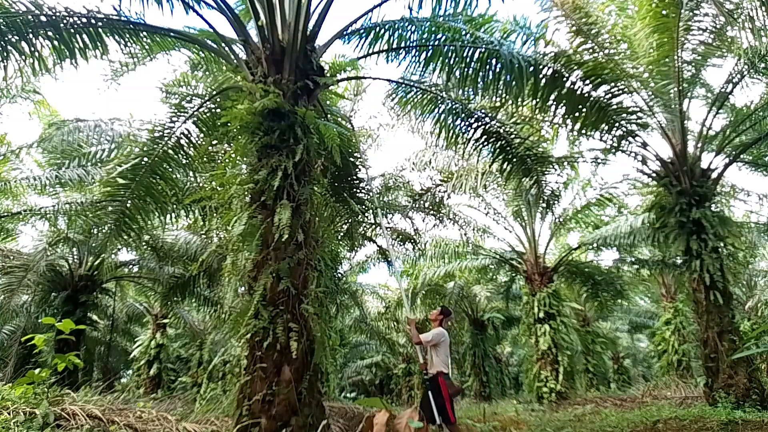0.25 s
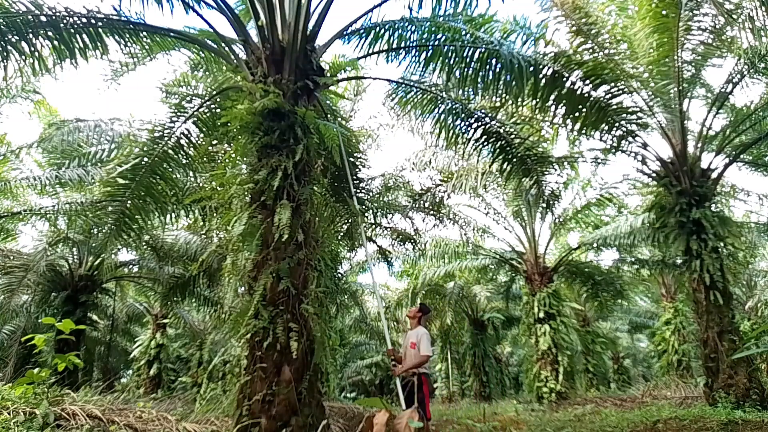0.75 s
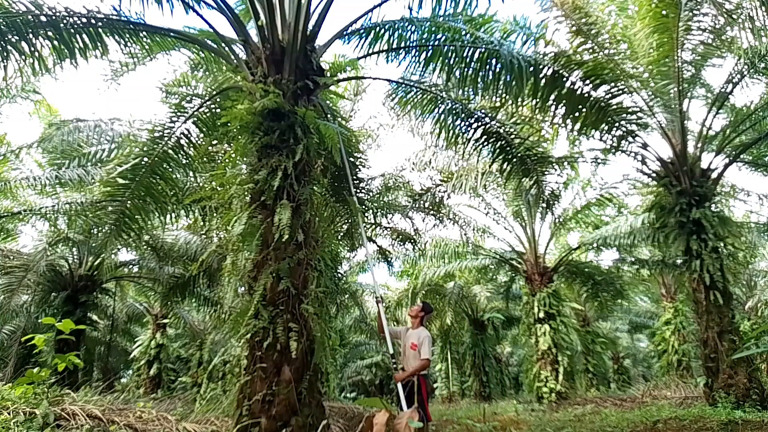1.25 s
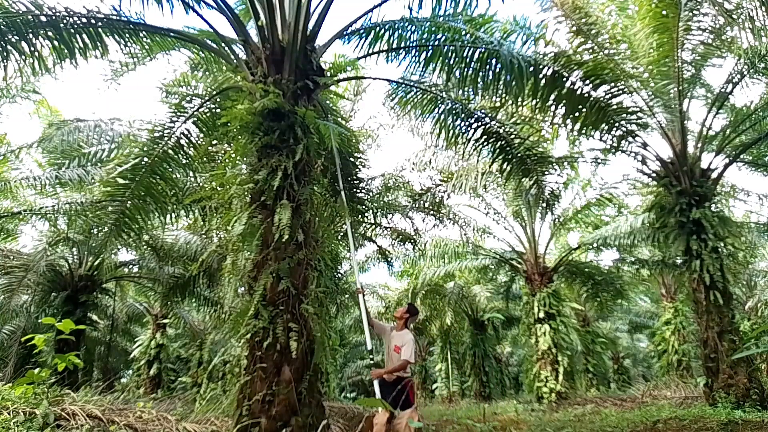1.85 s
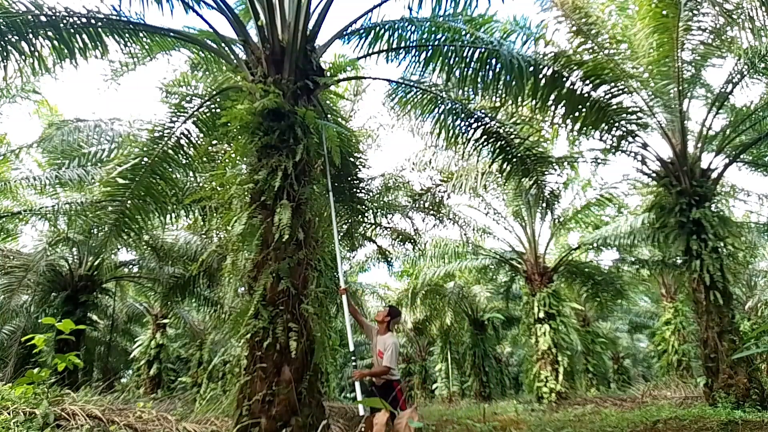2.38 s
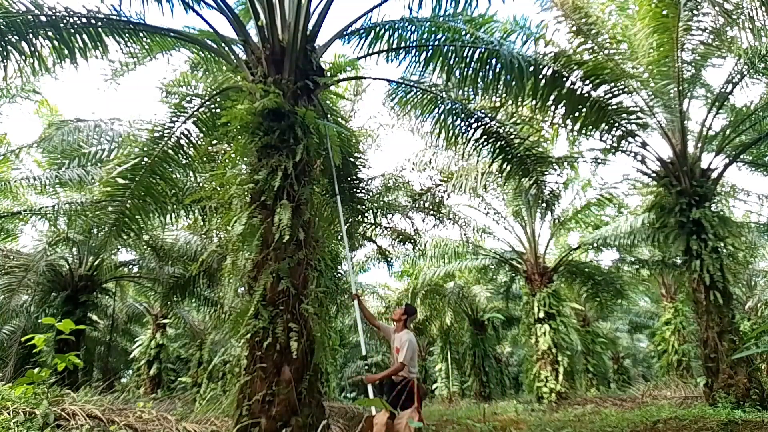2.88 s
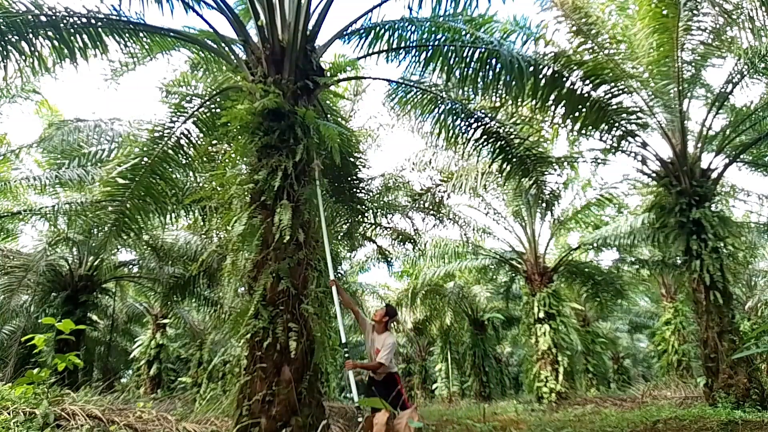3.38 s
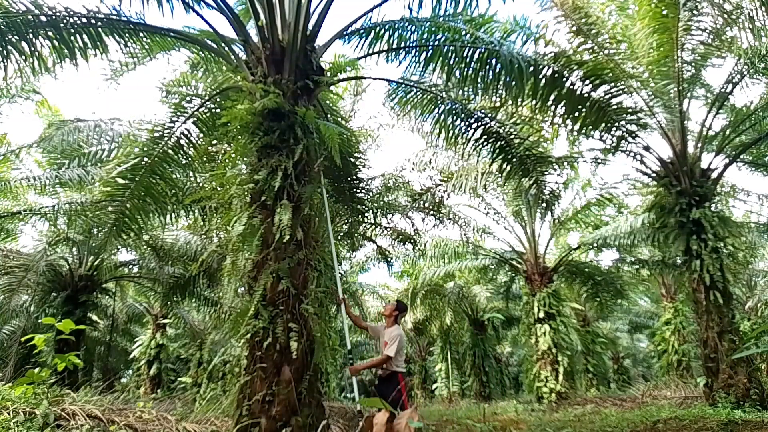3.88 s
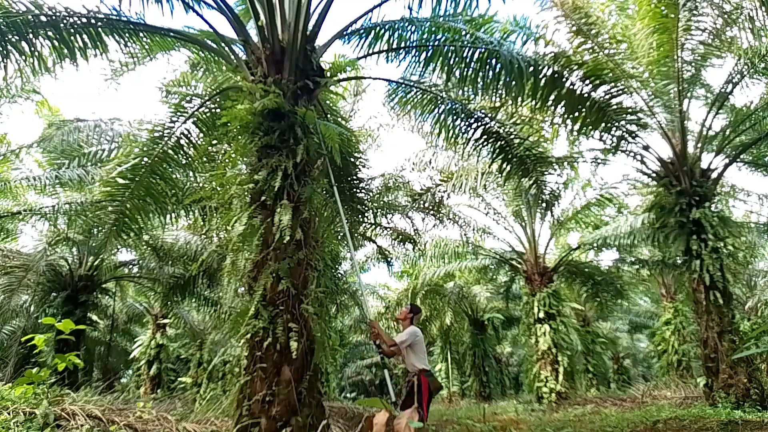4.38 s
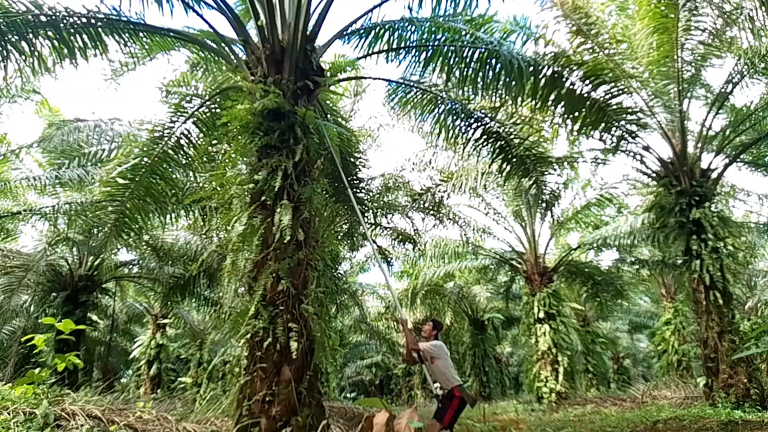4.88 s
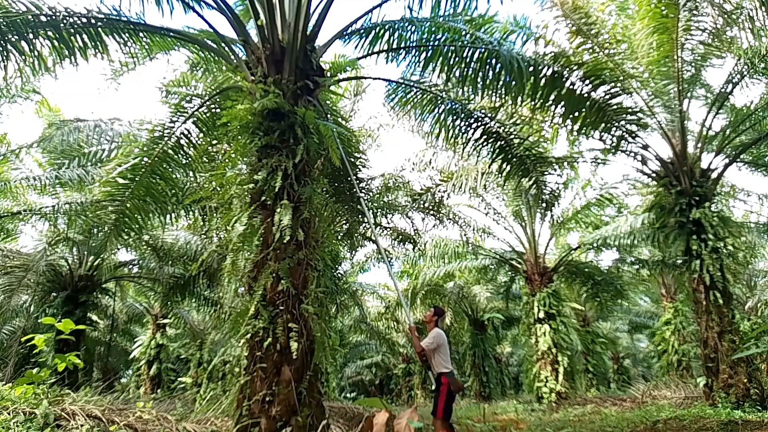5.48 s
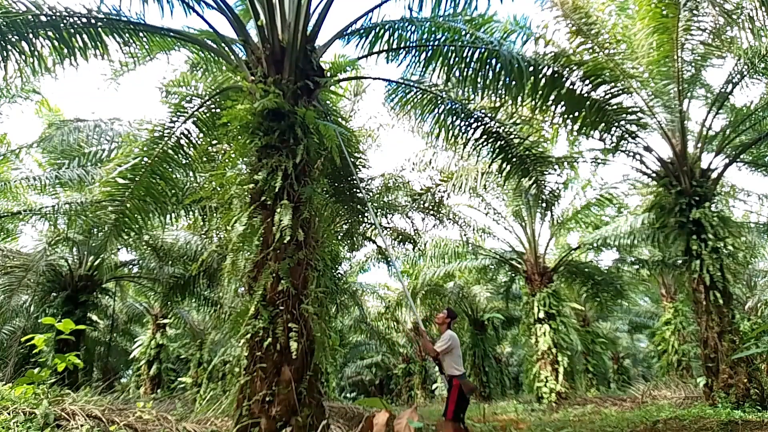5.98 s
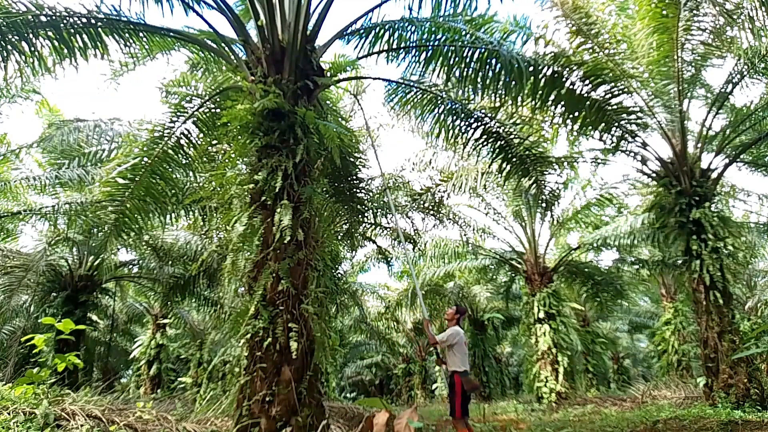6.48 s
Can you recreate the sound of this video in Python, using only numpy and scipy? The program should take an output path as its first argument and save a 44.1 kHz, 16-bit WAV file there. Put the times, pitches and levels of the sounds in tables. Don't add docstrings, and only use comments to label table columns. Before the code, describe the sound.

In an open palm grove, a small microphone some metres away hears a long-poled blade working overhead. Soft cicada buzz and leaf hush run throughout, with light stirring of dry fronds. At 0.65 s a short crack and fibre rip lands, with small ticks to 0.9. Around 1.45 s comes a sharp cut with a bright wooden knock. Softer crunches and squeaks follow at 2.3 and 2.55 s, as a very faint far engine rises in pitch. At 3.4-3.5 s a double tearing stroke ends in low stalk thumps and rustle. A knock sounds at 4.5 s, a crack at 4.8, then a long, loud ripping burst at 4.95-5.1 with snaps, squeaks and thumps. Rapid hard cracks and knocks hit at 5.65-5.8, and a final fierce crunch at 6.0-6.1 fades into leaf rustle, with a small snap at 6.65. A short tree-scattered wash trails each cut.

```python
import sys
import numpy as np
from scipy import signal
from scipy.fft import rfft, irfft
from scipy.io import wavfile
from scipy.ndimage import uniform_filter1d

SR = 44100
rng = np.random.default_rng(int(sys.argv[2]) if len(sys.argv) > 2 else 0)


def gain_from_db(level_db):
    decades = np.asarray(level_db, float) / 20
    return 10 ** decades


def output_pcm(signal):
    pcm = np.clip(np.atleast_2d(signal).T, -1, 1) * 32767
    wavfile.write(sys.argv[1], SR, np.round(pcm).astype(np.int16))


N = 297234


def unit(x):
    return x / np.sqrt(np.mean(x ** 2))


def track(table, column=1):
    rows = np.array(table, float)
    return np.interp(np.arange(N) / SR, rows[:, 0], rows[:, column])


def colour(x, points):
    hz, db = np.transpose(points)
    bin_hz = (np.arange(1025) + 0.1) * SR / 2048
    log_gain = np.interp(np.log(bin_hz), np.log(hz), db) * np.log(10) / 20
    cepstrum = irfft(log_gain)
    cepstrum[1:1024] *= 2
    cepstrum[1025:] = 0
    response = irfft(np.exp(rfft(cepstrum)))
    return signal.fftconvolve(x, response)[:len(x)]


def ring(x, hz, width_hz):
    return signal.lfilter(*signal.iirpeak(hz, hz / width_hz, fs=SR), x)


def walk(rate):
    hold = int(SR / rate)
    steps = np.repeat(rng.standard_normal(N // hold + 1), hold)
    smooth = uniform_filter1d(uniform_filter1d(steps, hold), hold)
    return 1.3 * smooth[:N]


def crackle(rate, spread_db):
    chance, sign, size = rng.random((3, N))
    clicks = (chance < rate / SR) * np.sign(sign - 0.5)
    return unit(clicks * gain_from_db(-spread_db * np.log(size + 0.04)))


def decay(t, t60):
    return np.exp(-np.log(1000) * t / t60)


def add(out, s, sound):
    i = int(s * SR)
    out[i:i + len(sound)] += sound[:N - i]


# pitch_hz, level_db (per Hz)
FIBRE_OUTLINE = [(290, -20), (500, -12), (833, -7.5), (925, -10), (1710, -5.5), (1880, -6), (2230, -8.5),
                 (2880, -8), (3470, -10), (8000, -30.5), (10400, -7), (17600, -120)]
# pitch_hz, level_db (per Hz)
LEAFLET_OUTLINE = [(3820, -25), (6500, -71), (7790, 3), (9510, 8.5), (12800, -13), (15100, -1.5),
                   (16000, -23)]


def tearing():
    fibre_db, stalk_db, leaflet_db, brightness_db = effort()
    slip = gain_from_db(2 * walk(110))
    outline_hz, outline_db = np.transpose(FIBRE_OUTLINE)
    fibres = power = 0
    bundles = crackle(220, spread_db=0.5)
    for hz in 600 * 2 ** np.arange(0, 3.8, 1 / 3):
        size_db = np.interp(np.log(hz), np.log(outline_hz), outline_db) + 10 * np.log10(hz)
        size = gain_from_db(size_db + brightness_db * np.log2(hz / 2200))
        grains = crackle(1200, spread_db=1.0) * gain_from_db(2.6 * walk(45)) + 0.6 * bundles
        fibres = fibres + size * unit(ring(ring(grains, hz, 0.53 * hz), hz, 0.51 * hz))
        power = power + size ** 2
    fibres = unit(fibres * slip / np.sqrt(power))
    creak = crackle(300, spread_db=2.0) * gain_from_db(2 * walk(50))
    stalk = unit(ring(ring(creak, 286, 101), 394, 170))
    leaflets = unit(colour(crackle(7200, spread_db=2.5) * slip, LEAFLET_OUTLINE))
    return gain_from_db(fibre_db) * fibres + gain_from_db(stalk_db) * stalk + gain_from_db(leaflet_db) * leaflets


# start_s, rise_s, hold_s, level_db, fade_s (by 60 dB)
BLADE_STROKES = [(.635, 0.018, 0.0042, -39.5, 0.049), (1.427, 0.017, 0.0035, -42.5, 0.074),
                 (1.45, 0.015, 0.027, -54, 0.17), (2.288, 0.013, 0.035, -45.5, 0.13),
                 (3.364, 0.02, 0.027, -44.5, 0.48), (3.45, 0.027, 0.01, -39.5, 0.14),
                 (4.33, 0.022, 0.022, -68, 1), (4.955, 0.033, 0.09, -33.5, 0.2),
                 (5.045, 0.015, 0.034, -35, 0.15), (5.63, 0.0028, 0.01, -45, 0.25),
                 (5.652, 0.005, 0.0084, -38.5, 0.05), (5.672, 0.0061, 0.026, -38, 0.29),
                 (5.757, 0.0014, 0.0038, -39, 0.03), (5.772, 0.0046, .005, -44, 0.21),
                 (5.989, 0.0057, .012, -64, .1), (6.012, 0.031, 0.018, -42, .2),
                 (6.058, 0.0068, 0.013, -39, 0.1), (6.081, 0.0035, 0.0079, -31, 0.13)]
# start_s, rise_s, hold_s, level_db, fade_s (by 60 dB)
FROND_SHAKES = [(.2, 0.034, 0.02, -57.5, 0.42), (.66, 0.016, .005, -52, 0.49),
                (.78, 0.058, 0.034, -62, 0.33), (1.483, .004, .01, -66, 0.36),
                (1.8, 0.043, 0.034, -61, 0.61), (2.34, 0.0069, 0.0088, -51.5, 0.33),
                (2.535, 0.0043, 0.011, -51.5, 0.5), (2.64, 0.031, 0.12, -59.5, 0.58),
                (3.51, 0.0067, 0.016, -54.5, 1.2), (3.71, 0.0052, 0.0098, -57, 1.33),
                (4.8, 0.011, 0.031, -59.5, 0.42), (5.1, 0.02, 0.005, -44.5, 0.51),
                (5.22, 0.013, 0.015, -62.5, 0.95), (5.8, 0.016, 0.024, -55, 0.53),
                (6.104, 0.0087, 0.017, -41, 0.4), (6.2, 0.021, 0.021, -57.5, 1.94),
                (6.65, 0.017, 0.031, -60.5, 0.6)]
# time_s, level_db
POLE_STIR = [(0.0, -73.5), (.13, -65.5), (.6, -69.5), (1.0, -66), (1.4, -64), (1.7, -65.5), (2.2, -68.5),
             (3.0, -68), (3.3, -68), (3.9, -71.5), (4.25, -64.5), (4.5, -62.5), (4.9, -63.5), (5.6, -64.5),
             (5.95, -65.5), (6.45, -71.5), (6.74, -72)]
# stalk_db, leaflets_db, brightness_db (per octave)
MOTION_EXCITES = [
    (-7, -15.5, -1.5),
    (-14.5, -9.5, 2),
    (-8.5, -15, -0.9),
]


def effort():
    power = np.array([swell(BLADE_STROKES), swell(FROND_SHAKES), gain_from_db(2 * track(POLE_STIR))])
    stalk_share, leaflet_share, brightness = np.array(MOTION_EXCITES).T
    total = power.sum(axis=0)
    fibre_db = 10 * np.log10(total)
    stalk_db = 10 * np.log10(gain_from_db(2 * stalk_share) @ power)
    leaflet_db = 10 * np.log10(gain_from_db(2 * leaflet_share) @ power)
    return fibre_db, stalk_db, leaflet_db, brightness @ power / total


def swell(motions):
    rise_db = 16.5
    t, power = np.arange(0, N / SR, 0.001), 1e-12
    for s, rise, hold, db, t60 in motions:
        rising = rise_db * np.clip((t - s) / max(rise, 0.001) - 1, -1, 0)
        fading = 60 * np.clip(t - s - rise - hold, 0, None) / max(t60, 0.02)
        power = power + (t >= s) * gain_from_db(2 * (db + rising - fading))
    return np.interp(np.arange(N) / SR, t, power)


# start_s, peak_db, pitch_hz, treble_db, length_s
SNAPS = [(0.6522, -26.5, 2000, -11, 0.004), (0.7645, -39.5, 1690, -18, 0.01),
         (1.4403, -31, 2000, -4, 0.006), (1.4832, -33, 3520, -10, 0.0018),
         (2.534, -29, 2000, -1, 0.0031), (2.535, -36.5, 5600, -3, 0.0089),
         (3.378, -37.5, 2430, -18, .008), (3.4635, -41, 4000, 9, .0051),
         (3.473, -47, 1450, -21, 0.0087), (4.811, -28.5, 2430, -20, 0.0037),
         (4.854, -38, 1550, -29, 0.02), (4.9615, -31, 2400, -20, 0.003),
         (4.974, -25, 2500, -31, 0.04), (5.633, -33.5, 1950, -4, 0.0091),
         (5.656, -28.5, 2300, -12, 0.018), (5.664, -20, 1800, 2, 0.0027),
         (5.7587, -21, 1900, -4, 0.0043), (5.778, -31, 1470, -22, 0.0073),
         (6.0445, -33, 1900, -20, .004), (6.086, -35, 2900, -18, 0.0021),
         (6.095, -42, 2670, -12, 0.0027), (5.677, -28, 1500, -20, .006),
         (5.7065, -28, 1500, -18, .007), (5.808, -37, 1300, -20, .006), (5.689, -33, 3500, -2, .003),
         (3.395, -35, 2600, -12, .004), (3.419, -36, 2300, -20, .004), (3.443, -38, 2000, -20, .004),
         (5.032, -26, 2300, -20, .003), (1.483, -26, 2000, -7, .001), (1.4405, -38, 4500, -6, .002),
         (6.0848, -19.5, 2600, -18, .004), (.868, -49, 4000, -20, .004)]
# start_s, peak_db, pitch_hz, length_s
MORE_SNAPS = [(0.224, -46, 1560, 0.044), (0.807, -44, 1700, 0.016), (0.868, -44, 1290, 0.018),
              (1.201, -46, 2100, 0.0079), (1.337, -47, 2500, 0.0055), (1.347, -42.5, 1900, .004),
              (1.969, -42.5, 1350, .004), (2.025, -47, 2800, 0.0027), (2.261, -43, 2300, 0.009),
              (2.2825, -42, 1500, 0.011), (2.502, -45, 2520, 0.0096), (2.764, -42.5, 1300, 0.0099),
              (2.822, -44, 1960, 0.0051), (3.872, -44.5, 2660, 0.0044), (3.873, -47.5, 5000, .004),
              (4.352, -42.5, 1110, 0.023), (4.709, -42, 1700, 0.011), (5.526, -51, 1700, 0.0037),
              (6.007, -49, 4500, .003), (6.356, -44.5, 3350, 0.024), (6.663, -37.5, 2490, 0.0056),
              (0.76, -43, 1700, .006), (0.817, -48, 1600, .005), (2.487, -52, 3100, .003),
              (2.513, -50, 2600, .004), (2.633, -50, 2200, .003), (2.711, -44, 2080, 0.0034),
              (2.736, -58, 3000, 0.0028), (2.817, -48, 3000, 0.0022), (3.373, -41, 1600, 0.004),
              (3.476, -34, 3000, .002), (3.505, -41, 3500, .002), (4.978, -23, 2300, .002),
              (4.9855, -28, 2500, .002), (4.9975, -21, 2000, 0.0018), (5.062, -20, 2200, 0.0022),
              (5.073, -21, 2800, .002), (5.084, -23, 3020, 0.0022), (5.125, -33, 1500, .004),
              (6.002, -41, 2700, .004), (6.064, -26, 2900, .002), (6.09, -19.5, 2450, .002),
              (1.456, -41, 1600, .003), (4.714, -42, 2500, .005), (4.855, -41.5, 4000, .003),
              (5.686, -28, 2000, .005), (5.683, -35, 1800, .004), (2.319, -30, 2200, .003),
              (4.826, -43, 3000, .004)]


def snaps():
    width_hz, light_treble_db = 2130, -23
    light = [(s, db, hz, light_treble_db, length) for s, db, hz, length in MORE_SNAPS]
    out, t = np.zeros(N), np.arange(2048) / SR
    for s, db, hz, treble_db, length in SNAPS + light:
        noise = rng.standard_normal((2, len(t)))
        fade = np.exp(-t / max(length, 5e-4)) + 1.6 * np.exp(-t / 0.00085)
        fade = fade * np.clip(t / 0.00026, 0, 1)
        split = ring(ring(noise[0] * fade, hz, width_hz), hz, width_hz)
        split = signal.lfilter(*signal.butter(2, hz + width_hz, fs=SR), split)
        split = signal.lfilter(*signal.butter(2, 0.35 * hz, "high", fs=SR), split)
        tick = colour(noise[1] * fade ** 1.26, LEAFLET_OUTLINE)
        tick = gain_from_db(treble_db - 8.5) * tick / np.abs(tick).max()
        add(out, s, gain_from_db(db) * (split / np.abs(split).max() + tick))
    return out


# start_s, length_s
BLADE_SLIDES = [(.65, .06), (1.49, .035), (2.3, .05), (2.538, .127), (3.385, .03), (4.98, .065),
                (4.965, .14), (6.016, .105), (6.02, .085), (3.385, .07), (3.385, .025), (3.385, .025),
                (2.67, .07), (5.992, .02), (5.992, .02), (6.04, .08), (5.685, .035), (2.54, .045),
                (6.048, .014), (6.086, .018), (1.488, .07), (3.475, .02), (5.07, .03), (3.427, .012),
                (2.298, .05), (2.3, .04), (2.41, .035), (6.03, .047), (6.056, .02), (4.988, .03),
                (.648, .09), (.665, .035), (5.015, .04), (5.085, .02), (6.048, .012), (6.035, .07),
                (4.98, .13), (3.39, .03), (3.375, .045), (3.375, .02), (2.765, .03), (5.055, .04),
                (3.445, .04), (6.1, .1), (6.125, .07)]
# pitch_hz, width_hz, level_db (over the fibres)
BLADE_NOTES = [(9460, 490, -9.5), (3700, 180, -12), (1960, 310, -5), (4260, 110, -3.5), (8700, 230, -15),
               (1950, 160, -8), (2600, 1300, -4.5), (2910, 150, -1.5), (1870, 160, -2.5), (1400, 240, -5),
               (4020, 250, -11), (5600, 240, -12), (2100, 200, -3), (2900, 420, 6), (1950, 180, 4),
               (9470, 840, -13), (1140, 380, -0.5), (4700, 200, -6), (5260, 300, -11), (1200, 330, -3.5),
               (1800, 830, 2), (3270, 370, -17), (4700, 300, -16), (1900, 270, -1.5), (2860, 290, -4.5),
               (5840, 300, -19), (2870, 250, -6), (1950, 130, 1), (2940, 150, -1), (1920, 130, -2),
               (4670, 110, -9), (4150, 150, -11), (2150, 160, -5), (4780, 200, -13), (5060, 150, -12),
               (6630, 500, -17), (9350, 1300, -17), (9200, 1000, -14), (2960, 200, -10.5), (2000, 200, -6),
               (890, 100, -3), (1850, 300, -10), (1390, 170, -6.5), (800, 450, -7), (1900, 500, -6)]


def squeaks():
    out, rub = np.zeros(N), crackle(1300, spread_db=2.5)
    for (s, length), (hz, width, db) in zip(BLADE_SLIDES, BLADE_NOTES):
        contact = rub[int(s * SR):][:int(length * SR)]
        tone = unit(ring(ring(contact, hz, width), hz, 2 * width))
        loudness = uniform_filter1d(np.abs(tone), size=260)
        tone = unit(tone / (loudness + 0.05) ** 0.67)
        add(out, s, gain_from_db(db) * tone * signal.windows.tukey(len(tone), 0.15))
    fibre_db = effort()[0]
    return out * gain_from_db(fibre_db)


# start_s, peak_db, pitch_hz, fade_s (by 60 dB)
WOOD_KNOCKS = [(0.766, -48, 1400, .021), (0.8115, -48, 1480, 0.024), (1.3371, -44, 820, 0.016),
               (1.4836, -27.5, 1400, 0.027), (1.484, -24.5, 1900, 0.021), (1.4853, -31.5, 1500, 0.025),
               (1.4849, -36, 3820, 0.022), (1.4894, -32, 1205, 0.017), (2.6568, -40, 1905, 0.022),
               (4.9, -44.5, 650, 0.01), (4.4768, -41.2, 1000, 0.0081), (5, -44, 2200, .008),
               (4.516, -26.7, 910, 0.011), (4.516, -41, 1860, 0.0092), (4.8115, -38, 1310, 0.02),
               (5.6633, -32, 1045, .033), (5.6908, -25.5, 1150, 0.027), (5.7811, -34, 900, .0171),
               (4.9618, -24.5, 2450, .012), (4.9695, -25, 2300, 0.011), (4.711, -43.5, 1380, 0.027),
               (4.712, -46, 1900, .02), (4.349, -43, 550, .03), (.766, -42.5, 1550, .025),
               (.769, -46, 860, .035), (0.74, -46, 1600, .02), (.714, -47, 1520, 0.028),
               (.717, -48, 2850, .02), (5.665, -30.5, 520, .02), (5.7595, -26.5, 1110, 0.027),
               (5.7605, -32, 3600, 0.022), (1.338, -47, 2800, .015), (.652, -40, 3100, .03),
               (6.093, -24, 2950, 0.022), (6.087, -27, 1900, .025), (5.125, -35, 990, 0.018),
               (.872, -52, 845, .035), (2.535, -36, 2980, .015), (1.4515, -37, 1700, .015),
               (3.433, -37, 1900, .015)]


def knocks():
    out, t = np.zeros(N), np.arange(3000) / SR
    for s, db, hz, t60 in WOOD_KNOCKS:
        fade = decay(t, np.clip(t60, 0.005, 0.035))
        add(out, s, gain_from_db(db) * fade * np.sin(2 * np.pi * hz * t))
    return out


# start_s, peak_db, pitch_hz, fade_s (by 60 dB)
STALK_THUMPS = [(0.65, -38, 282, 0.026), (0.688, -36, 324, 0.045), (3.506, -27, 343, 0.02),
                (1.21, -44, 352, 0.025), (1.349, -31.5, 328, 0.019), (1.436, -37.5, 290, 0.054),
                (1.483, -44, 440, 0.064), (2.307, -41.5, 434, 0.1), (2.504, -45.5, 416, 0.08),
                (2.536, -36.5, 480, 0.018), (2.658, -42, 394, 0.025), (2.764, -42.5, 368, 0.077),
                (3.376, -36, 374, 0.1), (3.402, -34, 373, 0.047), (3.447, -36.5, 332, 0.11),
                (3.49, -28.5, 352, 0.042), (4.341, -41.5, 421, 0.11), (4.358, -37, 336, 0.066),
                (4.515, -43, 382, 0.045), (4.644, -44.5, 352, 0.018), (4.71, -42.5, 288, 0.024),
                (4.812, -26, 333, 0.023), (4.862, -33, 327, 0.017), (4.961, -26.5, 340, 0.024),
                (5.056, -25.5, 320, 0.064), (5.097, -21.5, 325, 0.067), (5.18, -41, 342, 0.067),
                (5.776, -31, 510, 0.025), (6.034, -36.5, 345, 0.14), (6.087, -25, 350, 0.058),
                (2.488, -52, 394, 0.044), (2.635, -46, 398, .03), (2.72, -47, 400, 0.026),
                (2.82, -50, 410, 0.036), (3.523, -42, 334, 0.034), (3.545, -52, 340, .02),
                (0.772, -46.5, 400, 0.066), (4.826, -36.5, 347, 0.033), (5.008, -27, 308, 0.05),
                (5.125, -35, 347, 0.028), (2.338, -42, 420, .04), (4.61, -49, 353, 0.099),
                (0.33, -53, 298, .05), (5.03, -27.5, 297, .06), (3.499, -32, 300, 0.027),
                (5.643, -36, 420, 0.052), (5.697, -34.5, 370, .09), (5.73, -37, 340, .05),
                (5.746, -39, 350, .04), (5.615, -48, 348, .12), (6.052, -36, 340, .12)]


def thumps():
    out, t = np.zeros(N), np.arange(6000) / SR
    for s, db, hz, t60 in STALK_THUMPS:
        swing = (1 - np.exp(-t / 0.0018)) * decay(t, max(t60, 0.01))
        add(out, s, gain_from_db(db - 5.5) * swing / swing.max() * np.sin(2 * np.pi * hz * t))
    return out


# start_s, peak_db, pitch_hz, fade_s (by 60 dB)
TRUNK_JOLTS = [(.655, -64, 113, .3), (.66, -66, 72, .25), (4.47, -64, 96, .3), (5.07, -70, 126, .25),
               (6.08, -69, 128, .25), (.67, -66, 90, .2)]


def jolts():
    out, t = np.zeros(N), np.arange(12000) / SR
    for s, db, hz, t60 in TRUNK_JOLTS:
        bump = (1 - np.exp(-t / 0.014)) * decay(t, t60)
        add(out, s, gain_from_db(db) * bump * np.sin(2 * np.pi * hz * t))
    return out


def grove(x):
    t60_s, level_db = 0.35, -15
    t = np.arange(SR // 2) / SR
    scatter = rng.standard_normal(len(t)) * decay(t, t60_s) * np.clip(t / 0.015, 0, 1)
    scatter = colour(scatter, [(300, -2.0), (1500, 1.0), (4000, 7.5), (10000, -0.5)])
    scatter = scatter / np.sqrt(np.sum(scatter ** 2))
    return gain_from_db(level_db) * signal.fftconvolve(x, scatter)[:N]


# time_s, level_db
CICADA_LEVEL = [(0.0, -69), (.3, -68.5), (3.5, -67.5), (5.5, -69.5), (5.9, -67), (6.74, -68.5)]


def cicadas():
    clicks = crackle(2600, spread_db=-3.0) * gain_from_db(0.5 * walk(60) + 0.8 * walk(5))
    chorus = ring(ring(ring(clicks, 8240, 520), 8180, 680), 8440, 1000)
    return gain_from_db(track(CICADA_LEVEL)) * unit(chorus)


# pitch_hz, level_db (per Hz)
HUSH_OUTLINE = [(25, -24), (60, -13), (130, -8.5), (152, -23), (172, -29), (195, -13.5), (222, -7),
                (328, -3.5), (825, -11), (3070, -15), (6900, -28), (9500, -23.5), (12400, -36),
                (15500, -25)]


def leaf_hush():
    air = colour(rng.standard_normal(N), HUSH_OUTLINE)
    low = signal.lfilter(*signal.butter(2, 900, fs=SR), air)
    hush = low * gain_from_db(1.7 * walk(2.8)) + (air - low) * gain_from_db(1.0 * walk(6.0))
    return gain_from_db(-67) * unit(hush)


# time_s, level_db, firing_hz
ENGINE_RUMBLE = [(0.0, -93, 37.2), (2.15, -91, 37), (2.42, -77, 46), (3.0, -81, 45.5), (3.55, -78, 52),
                 (3.9, -83, 52), (4.7, -77, 54), (6.74, -77.5, 54.5)]
# time_s, level_db
ENGINE_OVERTONE = [(0.0, -84), (2.1, -85), (2.45, -79), (2.75, -84), (3.0, -94), (3.5, -82), (4.3, -84),
                   (4.8, -95), (6.74, -95)]


def far_engine():
    firing_hz = track(ENGINE_RUMBLE, column=2) * (1 + 0.012 * walk(5))
    turn = 2 * np.pi * np.cumsum(firing_hz) / SR
    rough = unit(ring(ring(rng.standard_normal(N), 64, 25), 66, 50))
    engine = 0.4 * rough + gain_from_db(2 * walk(9)) * np.sin(turn)
    overtone = gain_from_db(track(ENGINE_OVERTONE) + 2 * walk(6)) * np.sin(2 * turn)
    return gain_from_db(track(ENGINE_RUMBLE)) * unit(engine) + overtone


def scene():
    cut = tearing() + squeaks() + knocks() + snaps() + thumps()
    thud = gain_from_db(-11.5) * ring(ring(cut, 112, 50), 125, 70)
    bass_cut = signal.butter(N=8, Wn=235, btype="high", fs=SR, output="sos")
    cut = thud + signal.sosfilt(bass_cut, cut + grove(cut))
    cut = cut - 0.37 * ring(cut, 7620, 2900)
    return (cut + jolts() + cicadas() + leaf_hush() + far_engine())[None]


def low_pass(x):
    return signal.sosfilt(signal.butter(12, 15830, fs=SR, output="sos"), x)


def record(dry):
    top_cut = signal.ellip(10, 0.2, 60, 15800, fs=SR, output="sos")
    mix = signal.sosfilt(top_cut, dry)
    return low_pass(mix)


dry = scene()
out = record(dry)
output_pcm(out)
```